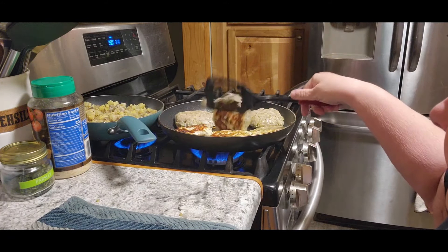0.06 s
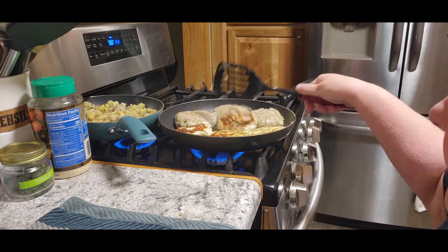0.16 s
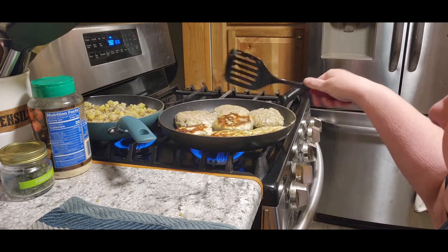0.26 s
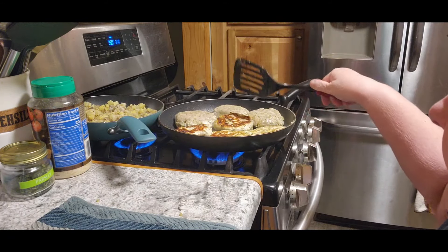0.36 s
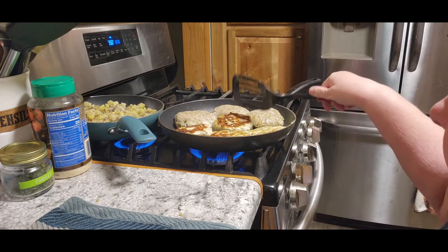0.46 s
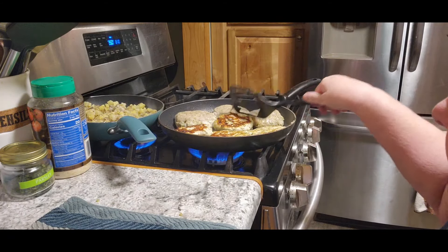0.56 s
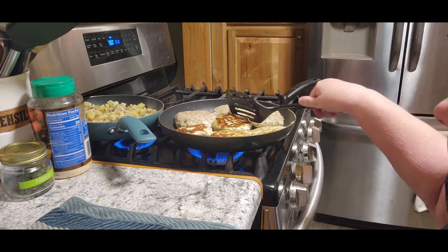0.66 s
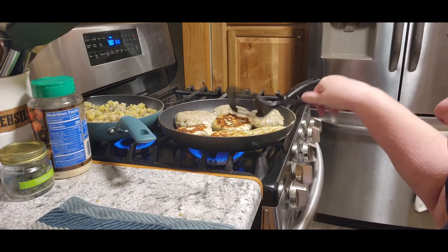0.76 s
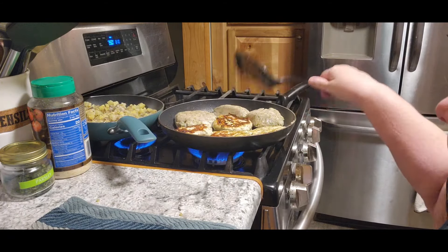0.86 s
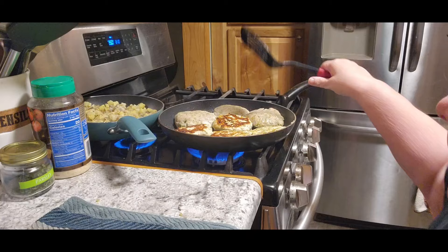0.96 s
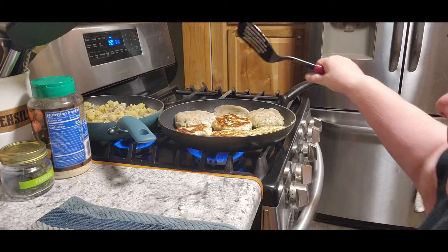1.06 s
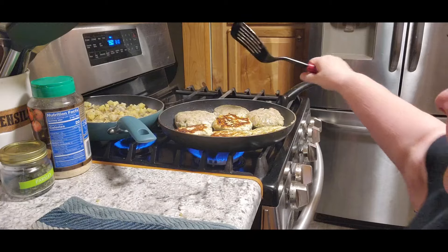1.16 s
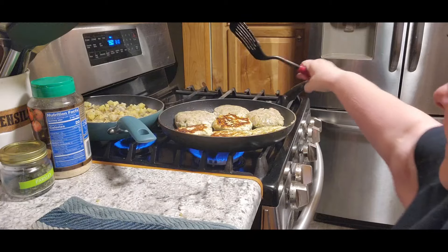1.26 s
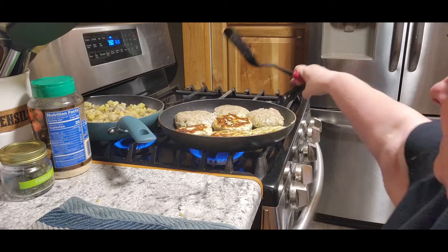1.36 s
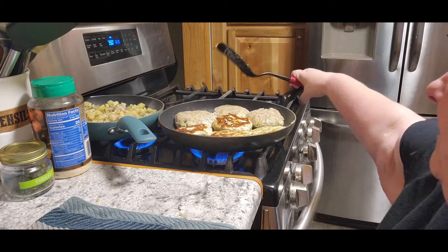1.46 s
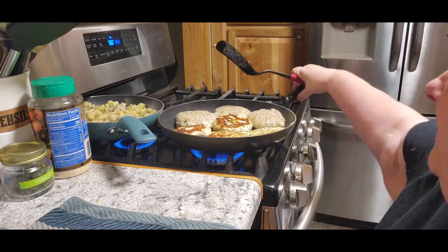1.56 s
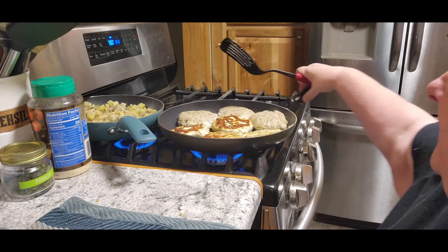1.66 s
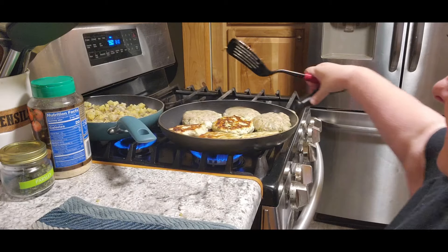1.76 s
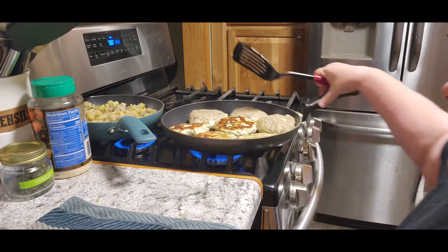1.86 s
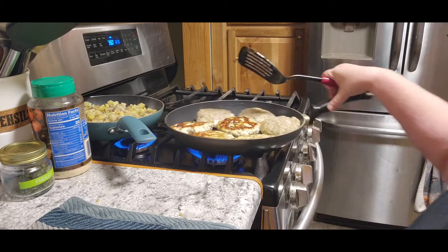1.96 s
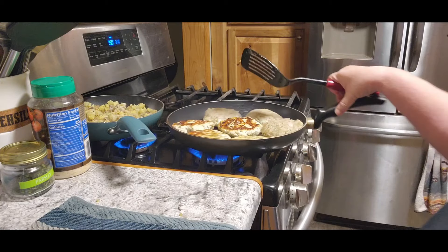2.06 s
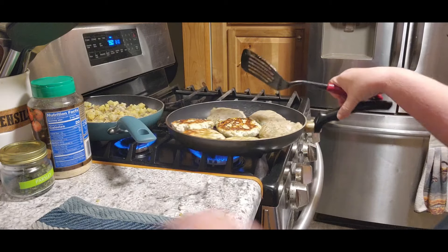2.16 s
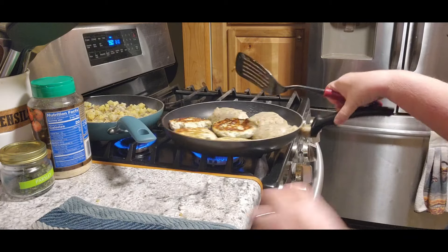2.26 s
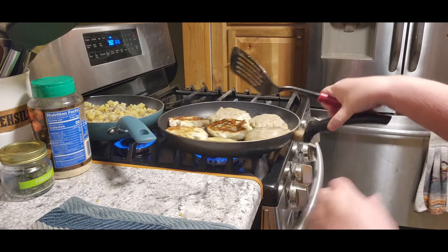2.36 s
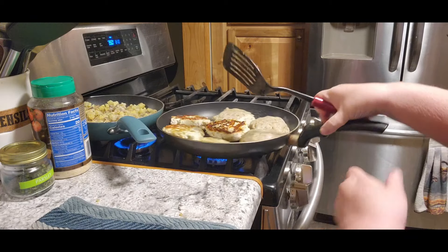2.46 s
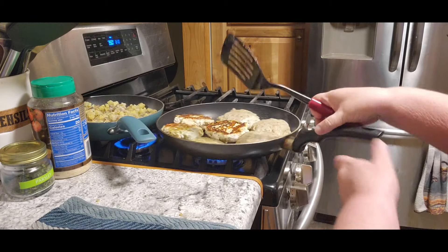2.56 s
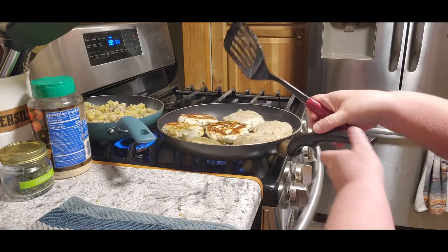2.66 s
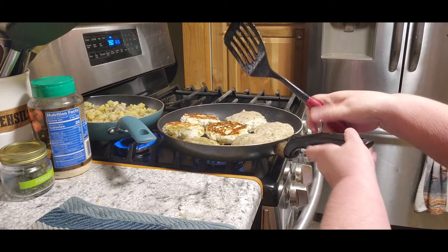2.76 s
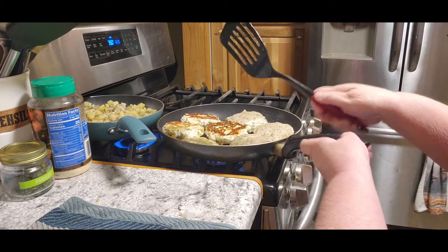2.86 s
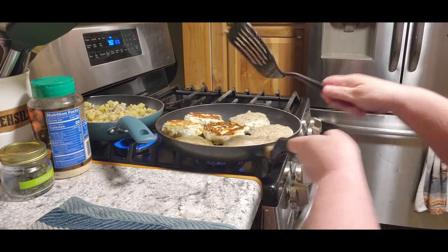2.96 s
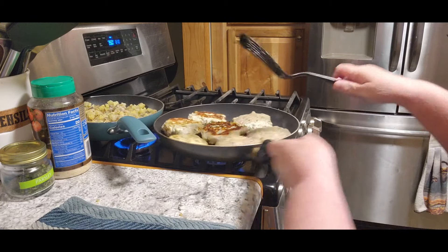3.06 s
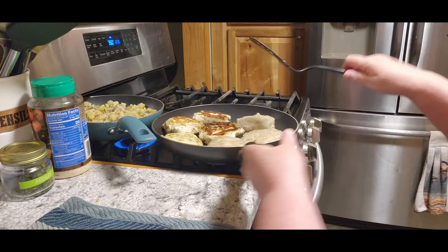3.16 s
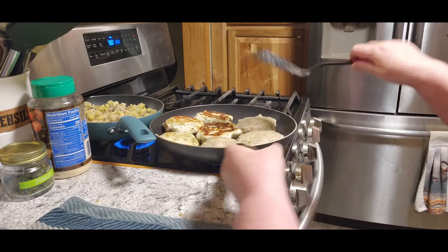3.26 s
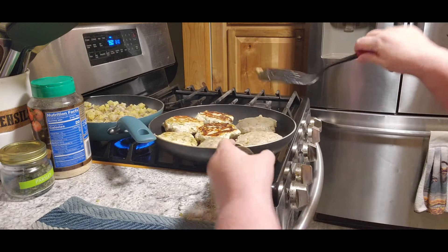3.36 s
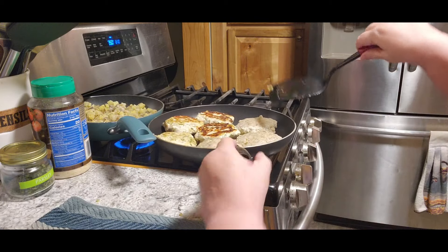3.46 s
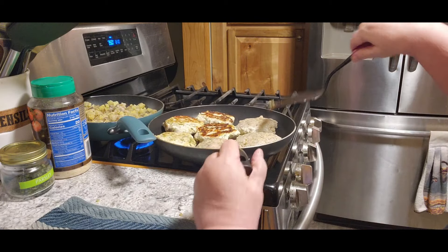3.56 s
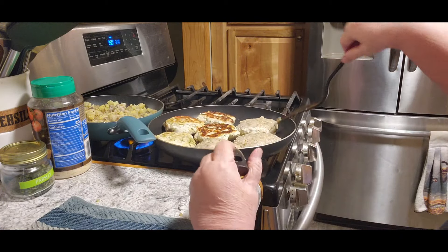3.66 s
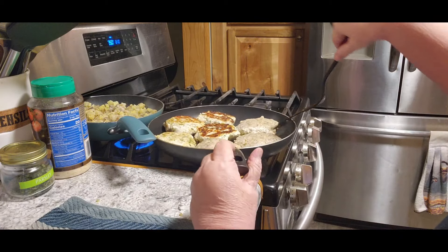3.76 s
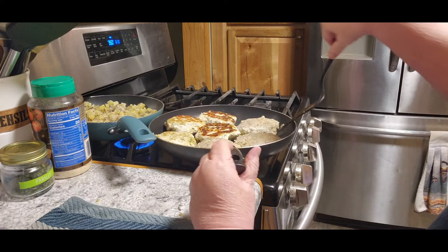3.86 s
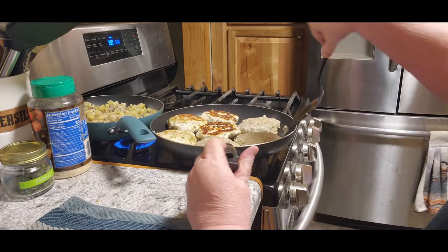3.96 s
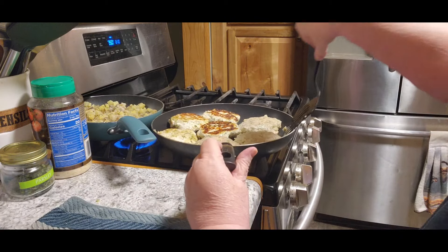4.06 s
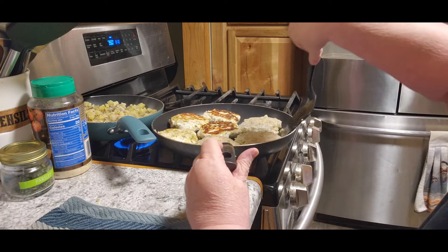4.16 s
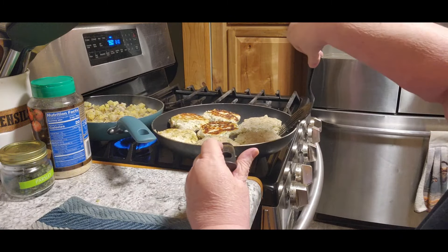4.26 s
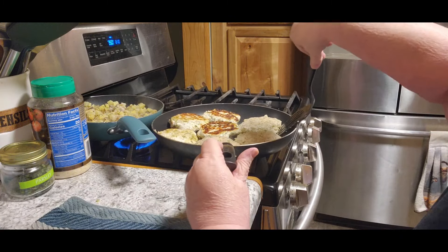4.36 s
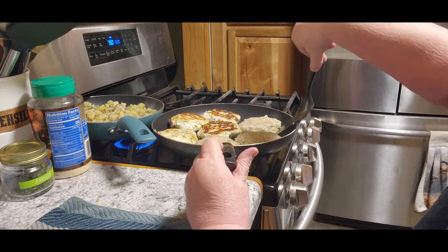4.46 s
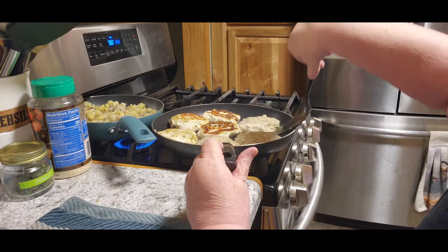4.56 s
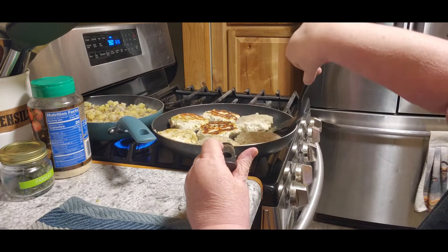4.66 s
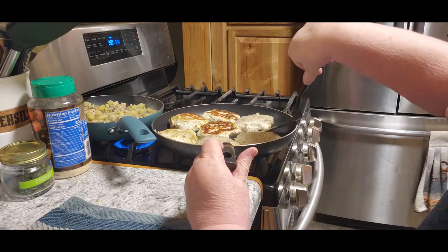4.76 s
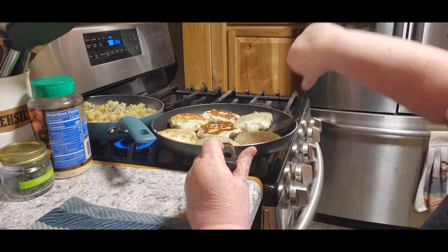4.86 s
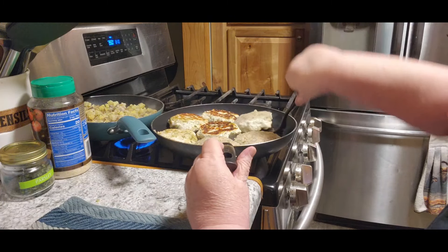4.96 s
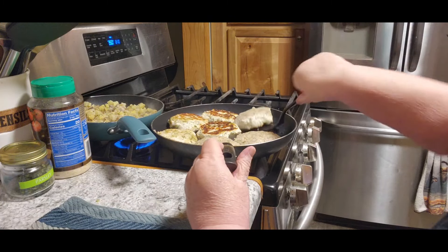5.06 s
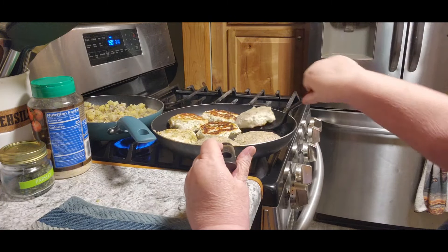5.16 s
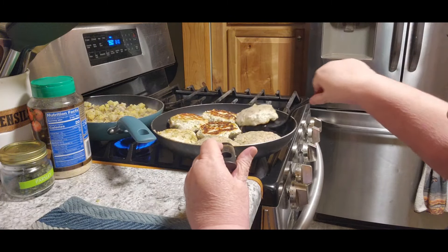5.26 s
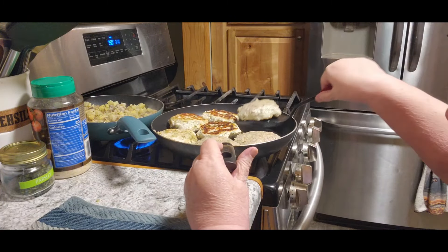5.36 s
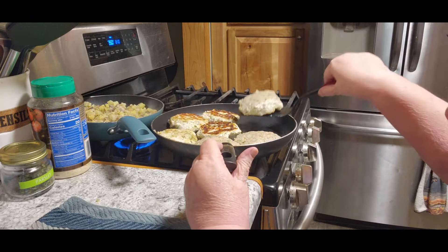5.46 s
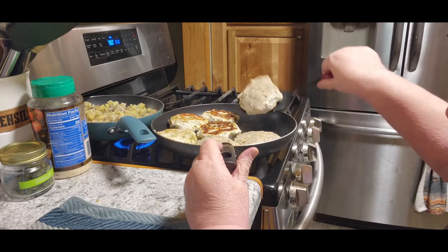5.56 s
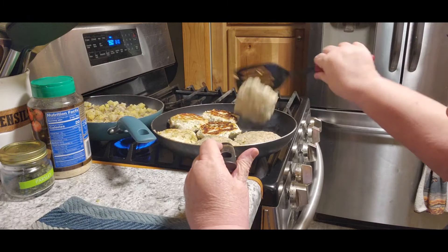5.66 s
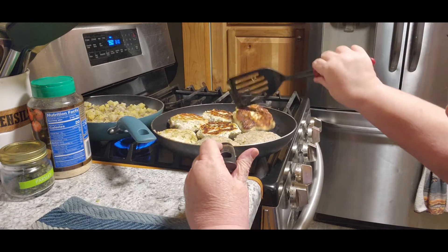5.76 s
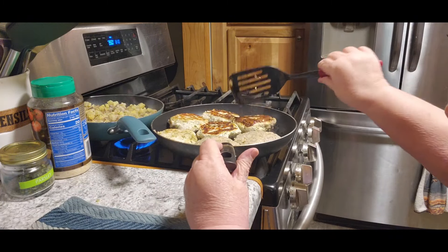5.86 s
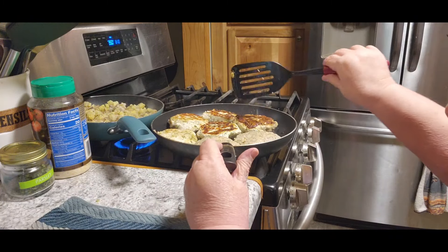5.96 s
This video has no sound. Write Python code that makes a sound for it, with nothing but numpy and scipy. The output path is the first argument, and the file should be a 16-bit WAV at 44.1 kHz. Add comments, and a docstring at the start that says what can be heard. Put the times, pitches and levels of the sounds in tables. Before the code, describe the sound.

Close by in a small home kitchen, a bright, crackling sizzle of patties frying in oil runs throughout. Scattered spatula ticks and faint metal pings come from the skillet as it slides softly on the grate, with a short clack just past the middle. Toward the end a turned patty lands with a dull slap and the oil hisses louder, over a faint low rush of gas flames.

```python
"""Patties frying in a skillet

Steam bubbles burst in hot oil, thousands a second, each a short damped ring; water spits, the pan rings.
A plastic spatula taps and scrapes, the pan shifts on its grate, a flipped patty slaps down and flares.
Gas burners and an appliance motor hum underneath; a small hard kitchen scatters the sound."""
import sys
import numpy as np
from scipy import signal
from scipy.fft import rfft, irfft, next_fast_len
from scipy.io import wavfile
from scipy.ndimage import map_coordinates

SR = 44100
rng = np.random.default_rng(int(sys.argv[2]) if len(sys.argv) > 2 else 0)


def inscribe(sig):
    """Save sig as 16-bit PCM at rate SR to the path in sys.argv[1].

    A 1-D sig is mono; a 2-D sig holds one channel per row.
    Samples are clipped to [-1, 1] before scaling.
    """
    pcm = np.round(np.clip(np.atleast_2d(sig).T, -1, 1) * 32767)
    wavfile.write(sys.argv[1], SR, pcm.astype(np.int16))


N = 265028

# sizzle colour (frequency [Hz], gain [dB])
OIL_SPECTRUM = [(200, -24), (420, -19), (650, -11), (950, -8), (1600, -6), (2700, -4.5), (4600, -0.1),
                (6600, -0.9), (8600, -3), (10200, -1.5), (11000, -4), (11600, -0.2), (15400, 5.5)]
# broad sizzle resonances (centre [Hz], width [Hz], lift [dB])
OIL_RESONANCES = [(2100, 420, 3), (5480, 950, 5), (7564, 770, 6.5)]
# wet meat meets oil (time [s], hold [s], sputter lift [dB], sizzle lift [dB], spray lift [dB])
STEAM_FLARES = [(.145, .28, 1.5, 1.3, 1.5), (.18, 0.038, -3, 0.5, 3.2), (.44, 0.024, 3, 3, 0),
                (.57, 0.028, -0.5, 4.5, 1), (.63, 0.046, 4.5, 4, 2.5), (.79, 0.032, -4, 2.5, 2),
                (.98, 0.18, 0.5, 2.2, 1.3), (1.78, 0.054, 4.5, 2.5, 1.5), (1.99, 0.07, 1.5, 2, 2),
                (2.66, .15, 0, -0.6, .5), (3.65, 0.05, -1, 1, 1), (4.14, 0.022, -2, 5, 3),
                (4.38, 0.023, 3, 3, -2), (4.6, 0.21, 2, 2, 0), (4.955, .29, 3, 2.5, 3.5),
                (4.985, 0.018, 0.5, 3, 4), (5.41, 0.097, 2.5, 1.5, 2.5), (5.715, 0.11, 4, 0, 3),
                (5.799, 0.22, 0, 4.5, 7), (5.812, 0.022, 5, 3.5, 0.5), (5.838, 0.13, 6, 3.5, 2),
                (5.85, 0.048, 3.5, -1, -2.5), (5.94, 0.019, -2, -0.5, 0.5)]
# skillet ring (frequency [Hz], width [Hz], gain [dB])
SKILLET_MODES = [(565, 26, -7), (730, 94, -14.5), (838, 50, -12.5), (1080, 19, -4.5), (1233, 18, -6),
                 (1497, 21, 1.5), (1771, 25, 1), (2154, 80, 5.5), (3144, 61, 4), (3720, 33, -2),
                 (5410, 160, 4.5), (7800, 160, 2)]
# extra ring as the pan is handled (time [s], length [s], level [dB])
HANDLING_SWELLS = [(1.48, .8, -63)]
# water spits, spatula clicks and scrapes (time [s], relative peak [dB], pitch [Hz], t60 [s])
SPITS_AND_CLICKS = [(0.33, -26, 5800, .02), (0.388, -28.5, 2316, 0.06), (0.455, -16, 7450, .06),
                    (0.635, -13.5, 7200, .02), (0.666, -22, 4800, 0.021), (0.669, -28, 2000, .1),
                    (1, -21, 5200, .02), (1.521, -16, 5400, 0.032), (2.126, -12, 5900, 0.012),
                    (2.383, -15, 5400, .03), (2.677, -14, 6500, .012), (2.747, -18, 5900, .015),
                    (2.766, -21, 4500, .012), (3.001, -24, 7500, .02), (3.512, -13, 6300, 0.044),
                    (3.653, -19, 7300, .03), (3.654, -19, 4300, .03), (3.687, -20, 2450, 0.04),
                    (4.485, -20, 7500, .02), (4.774, -23, 5800, .015), (4.781, -18, 12500, .06),
                    (5.223, -26, 2160, 0.19), (5.252, -28.5, 2050, 0.16), (5.413, -23.5, 1880, 0.022),
                    (5.618, -15, 5730, .03), (5.82, -17, 14800, .09), (5.945, -13, 13700, 0.077),
                    (5.946, -13, 7600, 0.066)]
# light touches on the skillet (time [s], level [dB], pitch [Hz])
PAN_PINGS = [(1.312, -35, 2120), (1.503, -39, 2150), (1.575, -36, 2160), (1.787, -35, 2200),
             (1.85, -36.5, 2130), (2.072, -31, 2170), (2.22, -34.5, 2110), (2.36, -38.5, 2160),
             (3.651, -37, 2150), (3.727, -37, 2190), (3.76, -34.5, 2120), (3.88, -38, 2130),
             (4.08, -35, 2130), (5.205, -33, 2150), (5.27, -35, 2120), (5.838, -33, 2170),
             (5.893, -29.5, 2170)]
# dull blows (time [s], relative thock level [dB], pitch [Hz], t60 [s], grate level [dB])
PAN_KNOCKS = [(.159, -46, 386, 0.09, -60), (.282, -50.5, 300, 0.077, -52), (1.826, -38.5, 506, 0.12, -54),
              (1.848, -46, 440, 0.089, -53), (3.774, -39, 420, .03, -57), (3.777, -37, 740, 0.028, -57),
              (3.786, -44, 297, 0.08, -39.5), (4.40, -38, 1120, 0.046, -64), (4.660, -40, 440, .06, -54),
              (4.981, -45, 600, .06, -49), (5.314, -37.5, 675, 0.047, -44), (5.852, -36, 550, 0.1, -51),
              (5.866, -20, 657, 0.032, -40), (5.905, -41, 520, .06, -43.5)]
# hard contacts (time [s], level [dB])
PAN_CLACKS = [(3.686, -31.5), (3.693, -36), (3.711, -38)]
# ring of a hard contact (frequency [Hz], gain [dB], t60 [s])
CONTACT_MODES = [(1260, -16, 0.026), (2255, -3, .05), (2470, 0, .042), (2660, -9, .035), (2980, -10, .025)]
# pan on its grate (frequency [Hz], gain [dB], t60 [s])
GRATE_MODES = [(149, -3, 0.15), (173, -3, 0.1), (207, -8.5, 0.091), (268, -6.5, 0.084), (387, -11.5, 0.12),
               (459.5, -7.5, 0.14), (559, -17, 0.19)]
# pan dragged and pressed on the grate (time [s], length [s], level [dB])
PAN_SLIDES = [(.15, 0.26, -61), (1.7, 0.34, -60.5), (2.1, 0.69, -59), (2.92, 0.51, -61.5),
              (3.56, 0.23, -63), (3.8, 0.17, -56.5), (4.06, 0.12, -57.5), (4.32, 0.15, -58),
              (4.62, 0.302, -62.5), (4.96, 0.15, -58.5), (5.28, 0.29, -61), (5.86, 0.11, -62)]
# gas flames (frequency [Hz], relative density [dB])
FLAME_SPECTRUM = [(12, -32), (20, -15), (32, 8), (75, -4.5), (97, -1), (145, -0.5), (215, -13), (278, -9),
                  (316, -9.5), (381, -6.5), (426, -16), (464, -6), (600, -23), (780, -54), (1320, -120)]
# appliance motor (frequency [Hz], rms level [dB])
MOTOR_PARTIALS = [(75, -66), (150, -73.5), (382, -75), (564, -87)]
# air stirred by the arm (time [s], length [s], level [dB])
ARM_DRAUGHTS = [(.21, 0.07, -50), (.345, 0.052, -47.5), (.45, .07, -48.5), (5.84, 0.06, -39.5),
                (5.925, .11, -43.5)]
# room decay (frequency [Hz], t60 [s])
ROOM_T60 = [(150, 0.43), (1000, 0.16), (5000, 0.34), (15000, 0.057)]
# left-right likeness (frequency [Hz], correlation [0..1])
STEREO_COHERENCE = [(100, 0.96), (300, 0.72), (600, 0.69), (1100, 0.42), (2200, 0.15), (5000, 0.00025),
                    (15000, 0.099)]
# channel colour (frequency [Hz], left over right [dB])
STEREO_TILT = [(1200, 0.76), (3000, 2.5), (4900, 0), (7400, 1.8), (8400, -0.5), (10100, -0.8), (11300, 6.5),
               (12200, -0.5), (14800, 5)]


def frying(fresh_db=2, drying_s=0.58):
    """Boiling eases as the meat dries; surges and steam flares lift it; the pan rings along."""
    surge_db = 0.55 * wobble(15)
    boil_db = fresh_db * np.exp(-np.arange(N) / SR / drying_s) + surge_db
    flare_db = flares()
    sputter_db, sizzle_db, spray_db = boil_db + 0.3 * wobble(160) + flare_db
    oil = patties(sputter_db - 43, sizzle_db - 38.5, spray_db - 37.5)
    oil = flicker(oil, flare_db.mean(0))
    ring_gain = amp(sizzle_db) * (amp(-49.5) + strokes(HANDLING_SWELLS, edge_s=.06))
    return oil + ring_gain * skillet_ring()


def patties(sputter_db, sizzle_db, spray_db, spots=14):
    """Each spot in the pan boils with three bubble sizes and has its own echoes."""
    sputter, sizzle, spray = amp(sputter_db), amp(sizzle_db), amp(spray_db)
    sound = np.zeros((2, N))
    for _ in range(spots):
        large = bubbles(per_s=140, low_hz=351.2, high_hz=3004, cycles=20.6, scatter_db=2.5, samples=1000)
        small = bubbles(per_s=340, low_hz=3018, high_hz=9204, cycles=4.5, scatter_db=3.5, samples=280)
        fine = bubbles(per_s=950, low_hz=8970, high_hz=16700, cycles=0.88, scatter_db=3.0, samples=32)
        spot = sputter * unit(large) + sizzle * unit(small) + spray * unit(fine)
        sound += kitchen(spot, near_db=3.0, room_db=4.5, near_t60_s=0.053)
    return filtered(sound, oil_colour) / np.sqrt(spots)


def bubbles(per_s, low_hz, high_hz, cycles, scatter_db, samples):
    """Bursting bubbles: short damped rings of random pitch, many weak, a few strong."""
    pitch_draw, life_draw, level_draw, time_draw = rng.random((int(per_s * N / SR), 4)).T[..., None]
    pitch_hz = low_hz + (high_hz - low_hz) * pitch_draw
    life_s = cycles * np.exp(2 * life_draw - 1) / pitch_hz
    strength = amp(-scatter_db * np.log(np.maximum(level_draw, .004))) / np.sqrt(life_s)
    k = np.arange(samples)
    rings = strength * np.sin(2 * np.pi * pitch_hz * k / SR) * np.exp(-k / SR / life_s)
    onsets = (time_draw * N).astype(int)
    return np.bincount((onsets + k).ravel(), rings.ravel(), N)[:N]


def oil_colour(hz):
    """Sizzle spectrum with its broad resonances, as gain."""
    lift_db = sum(db / (1 + (2 * (hz - centre) / width) ** 2) for centre, width, db in OIL_RESONANCES)
    return amp(along(OIL_SPECTRUM, hz) + lift_db)


def flares(attack_s=0.011, release_s=0.012):
    """Steam from wet meat rises fast, holds, dies away: dB lifts of sputter, sizzle and spray."""
    t, lift_db = np.arange(N) / SR, np.zeros((3, N))
    for time_s, hold_s, *lifts in STEAM_FLARES:
        rise = np.clip((t - time_s) / attack_s, 0, 1)
        fall = np.exp(-np.maximum(t - time_s - hold_s, 0) / release_s)
        lift_db += np.outer(lifts, rise * fall)
    return lift_db


def flicker(sound, flare_db, depth_db=0.88, damping_db_per_db=0.27):
    """Each resonance swells and sinks as the bursts move about; wet meat on the metal damps it."""
    change = np.zeros_like(sound)
    for centre_hz, width_hz, _ in OIL_RESONANCES:
        band = filtered(sound, lambda hz: 1 / (1 + (2 * (hz - centre_hz) / width_hz) ** 4))
        gain = amp(depth_db * wobble(24) - damping_db_per_db * flare_db)
        change += (gain - 1) * band
    return sound + change


def skillet_ring(bursts_per_s=110, scatter_db=2.5):
    """Bursts against the metal ring the pan, now and then strongly."""
    sizes = amp(scatter_db * np.minimum(rng.exponential(size=(2, N)), 4))
    bursts = sizes * (rng.random((2, N)) < bursts_per_s / SR)
    modes = lambda hz: sum(amp(db) * resonance(hz, centre, q=centre / width)
                           for centre, width, db in SKILLET_MODES)
    return unit(spread(filtered(bursts, modes)))


def spits_and_clicks():
    """Water spits, the spatula clicks and scrapes: sharp noise bursts, each around its own pitch."""
    track, t = np.zeros(N), np.arange(SR // 8) / SR
    for time_s, db, pitch_hz, t60_s in SPITS_AND_CLICKS:
        noise = rng.standard_normal(len(t)) * fade(t, t60_s)
        burst = filtered(noise, lambda hz: resonance(hz, pitch_hz, q=2.7) ** 2)
        add(track, time_s, amp(db - 5.5) * burst / np.abs(burst).max())
    return kitchen(track, near_db=1, room_db=-4.0, near_t60_s=0.069)


def pings(attack_s=0.0065, t60_s=0.092):
    """A light touch rings the skillet's main mode; the food soon damps it."""
    track, t = np.zeros(N), np.arange(SR // 4) / SR
    envelope = fade(t, t60_s) * (1 - np.exp(-t / attack_s))
    for time_s, db, pitch_hz in PAN_PINGS:
        add(track, time_s, amp(db) * np.sin(2 * np.pi * pitch_hz * t) * envelope)
    return kitchen(track, near_db=-8, room_db=-7)


def knocks(attack_s=0.0019):
    """Each blow is a damped thock with a puff of noise, and shakes the pan on its grate."""
    track, t = np.zeros(N), np.arange(SR // 3) / SR
    rise = 1 - np.exp(-t / attack_s)
    for time_s, db, pitch_hz, t60_s, grate_db in PAN_KNOCKS:
        noise = rng.standard_normal(len(t))
        puff = unit(filtered(noise, lambda hz: resonance(hz, pitch_hz, q=1.9) ** 2))
        thock = (0.68 * np.sin(2 * np.pi * pitch_hz * t) + 0.39 * puff) * fade(t, t60_s)
        grate = struck(GRATE_MODES, t, scatter_db=1.9)
        add(track, time_s, (amp(db + 2.0) * thock + amp(grate_db) * grate) * rise)
    return kitchen(track, near_db=-41, room_db=-5.5)


def clacks():
    """A hard contact and its rebounds ring a cluster of short modes."""
    track, t = np.zeros(N), np.arange(SR // 8) / SR
    for time_s, db in PAN_CLACKS:
        add(track, time_s, amp(db) * struck(CONTACT_MODES, t, scatter_db=1.7))
    return kitchen(track, near_db=-4, room_db=-9)


def sliding(slips_per_s=160, resting_db=-74):
    """Slips over the iron bars keep the pan's low modes rumbling; at rest it barely trembles."""
    slips = rng.standard_normal(N) * (rng.random(N) < slips_per_s / SR)
    grate = struck(GRATE_MODES, np.arange(SR // 3) / SR)
    rumble = unit(signal.fftconvolve(slips, grate)[:N])
    return (amp(resting_db) + strokes(PAN_SLIDES, edge_s=0.076)) * rumble


def burners(level_db=-60.5, waver_db=2.6):
    """Low, wavering rush of the gas flames."""
    noise = spread(rng.standard_normal((2, N)))
    rush = unit(filtered(noise, lambda hz: amp(along(FLAME_SPECTRUM, hz))))
    return rush * amp(level_db + waver_db * wobble(10))


def motor(drift_rad=.5):
    """Appliance hum: low partials with drifting phase."""
    t = np.arange(N) / SR
    return sum(amp(db) * np.sqrt(2) * np.sin(2 * np.pi * hz * t + drift_rad * wobble(3.7))
               for hz, db in MOTOR_PARTIALS)


def draughts(centre_hz=33):
    """Air stirred by the arm arrives as soft, deep puffs."""
    air = unit(filtered(rng.standard_normal(N), lambda hz: resonance(hz, centre_hz, q=1.8) ** 2))
    return strokes(ARM_DRAUGHTS, edge_s=0.035) * air


def kitchen(x, near_db, room_db, near_t60_s=0.048):
    """One spot in stereo: direct sound, quick echoes off pan and stove, then the room."""
    hz, t, spectra = signal.stft(rng.standard_normal((2, SR // 3)), SR, nperseg=256)
    tail = signal.istft(spectra * fade(t, along(ROOM_T60, hz)[:, None]), SR, nperseg=256)[1]
    near = rng.standard_normal(tail.shape) * fade(np.arange(tail.shape[1]) / SR, near_t60_s)
    tail *= amp(room_db) / np.linalg.norm(tail[0])
    near *= amp(near_db) / np.linalg.norm(near[0])
    response = spread(tail + near)
    response[0, 0] += 1
    response[1, rng.integers(1, 5)] += 1  # direct sound, 1-4 samples later on the right
    return signal.fftconvolve(x[None], response / np.linalg.norm(response[0]), axes=1)[:, :N]


def spread(pair):
    """Two unrelated channels to left and right: alike in the bass, apart in the treble."""
    angle = lambda hz: np.arccos(np.clip(along(STEREO_COHERENCE, hz), -1, 1)) / 2
    mid, side = filtered(pair, lambda hz: np.array([np.cos(angle(hz)), np.sin(angle(hz))]))
    return np.array([mid + side, mid - side])


def struck(modes, t, scatter_db=0):
    """Sum of damped modes, with optional random level scatter."""
    ring = np.zeros(len(t))
    for hz, db, t60_s in modes:
        if scatter_db:
            db += rng.normal(0, scatter_db)
        ring += amp(db) * np.sin(2 * np.pi * hz * t) * fade(t, t60_s)
    return ring


def strokes(rows, edge_s):
    """Gain curve of movements that fade in and out."""
    t = np.arange(N) / SR
    return sum(amp(db) * np.clip(.5 + np.minimum(t - time_s, time_s + length_s - t) / edge_s, 0, 1)
               for time_s, length_s, db in rows)


def amp(db):
    """Decibels to gain."""
    return 10 ** (np.asarray(db) / 20)


def unit(x):
    """Scale to rms 1."""
    return x / np.sqrt(np.mean(x ** 2) + 1e-20)


def along(points, hz):
    """Interpolate (frequency [Hz], value) points on a log axis."""
    knots_hz, values = np.transpose(points)
    return np.interp(np.log(hz + 1), np.log(knots_hz), values)


def wobble(knots_per_s):
    """Smooth random curve."""
    knots = rng.standard_normal(int(N * knots_per_s / SR) + 4)
    return map_coordinates(knots, [np.arange(N) * knots_per_s / SR])


def fade(t, t60_s):
    """Exponential decay, 60 dB in t60_s."""
    return np.exp(-np.log(1000) * t / t60_s)


def filtered(x, response):
    """Apply a frequency response."""
    n = x.shape[-1]
    padded = next_fast_len(n + 8192)
    return irfft(rfft(x, padded) * response(np.fft.rfftfreq(padded, 1 / SR)), padded)[..., :n]


def resonance(hz, centre_hz, q):
    """Causal band-pass response."""
    damping = 1j * hz * centre_hz / q
    return damping / (centre_hz ** 2 - hz ** 2 + damping)


def add(track, time_s, sound):
    """Mix a sound into a track at time_s."""
    part = track[..., round(time_s * SR):][..., :sound.shape[-1]]
    part += sound[..., :part.shape[-1]]


def scene():
    """Everything at the stove."""
    pan = frying() + spits_and_clicks() + pings() + knocks() + sliding()
    return pan + burners() + motor() + draughts() + clacks()


def record(dry, top_hz=15550):
    """Left and right colour the treble differently; nothing passes above top_hz."""
    return filtered(dry, lambda hz: amp(np.outer([.5, -.5], along(STEREO_TILT, hz))) * (hz < top_hz))


dry = scene()
out = record(dry)
inscribe(out)
```